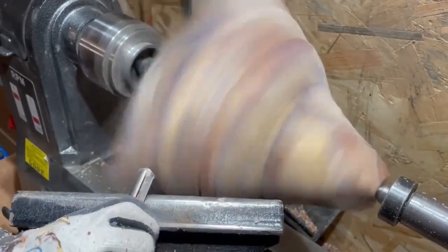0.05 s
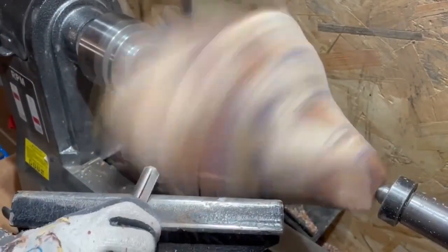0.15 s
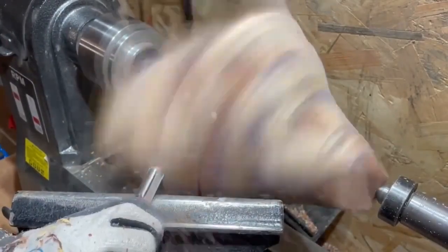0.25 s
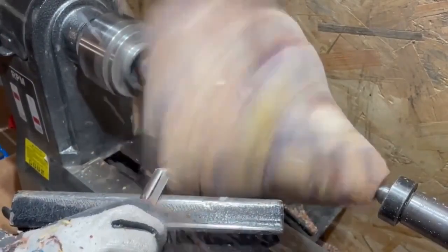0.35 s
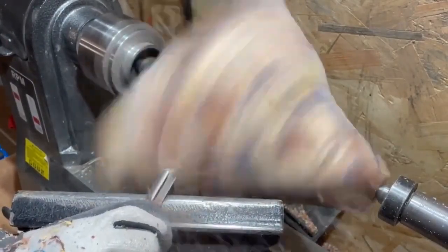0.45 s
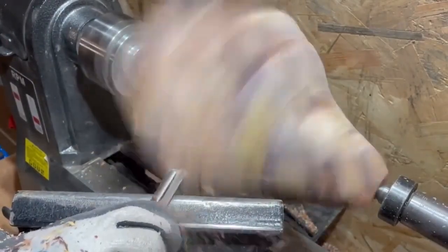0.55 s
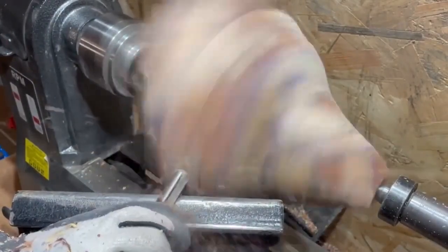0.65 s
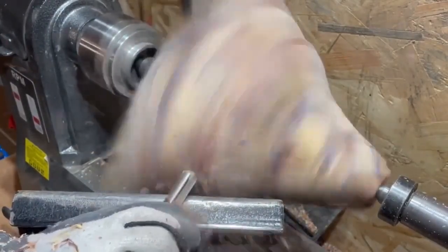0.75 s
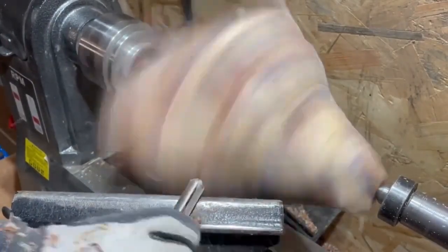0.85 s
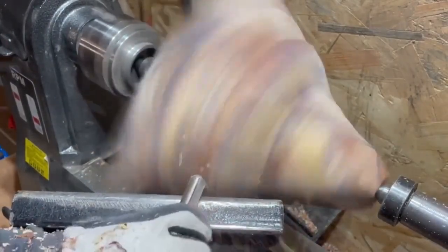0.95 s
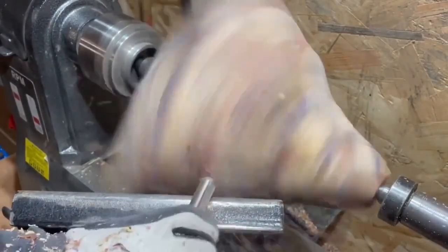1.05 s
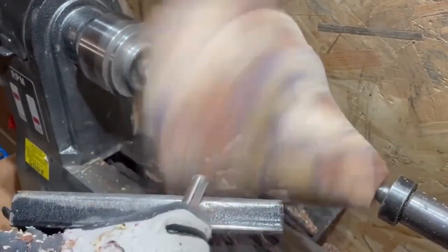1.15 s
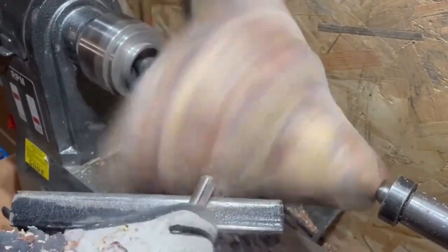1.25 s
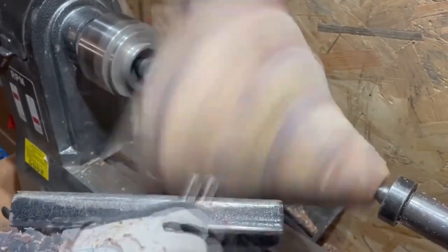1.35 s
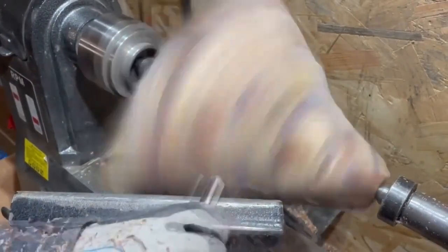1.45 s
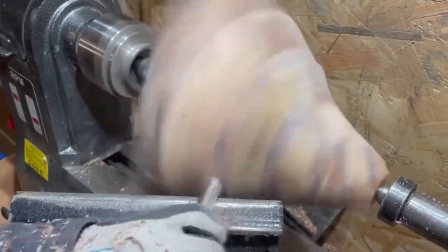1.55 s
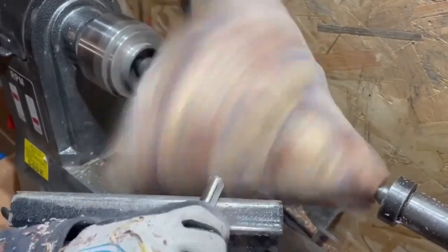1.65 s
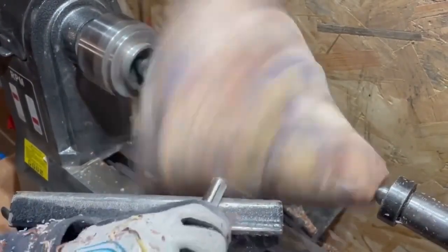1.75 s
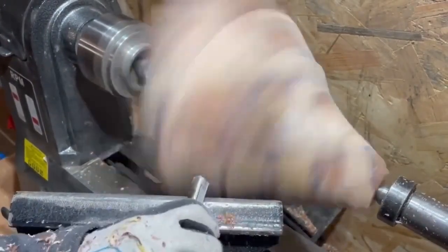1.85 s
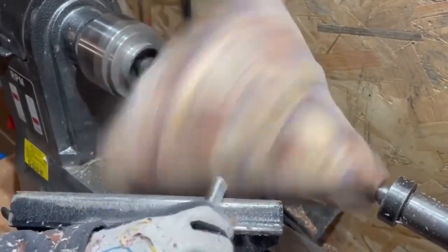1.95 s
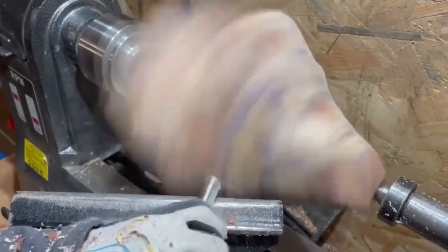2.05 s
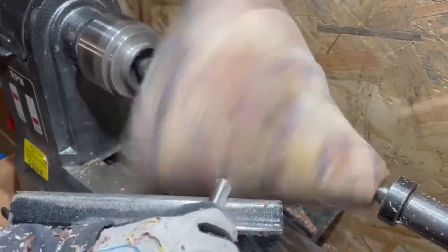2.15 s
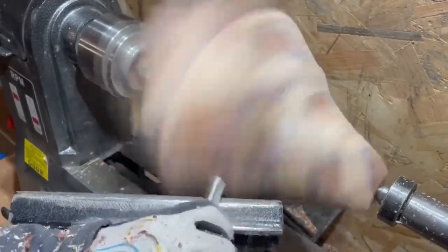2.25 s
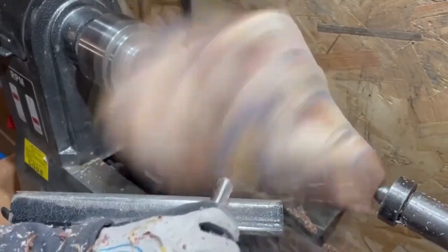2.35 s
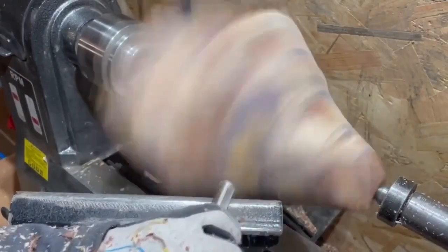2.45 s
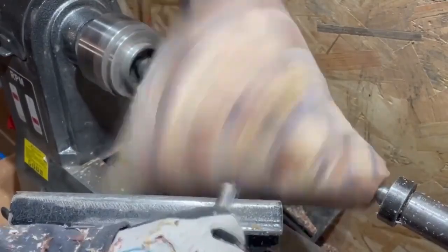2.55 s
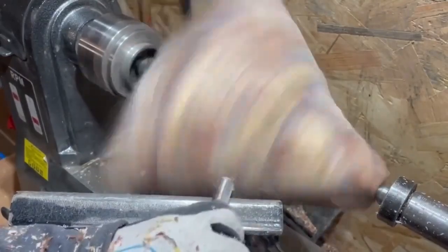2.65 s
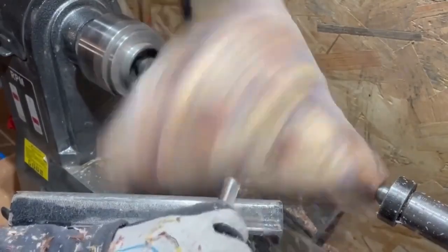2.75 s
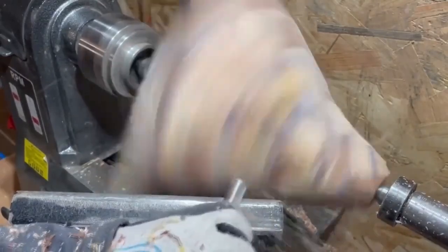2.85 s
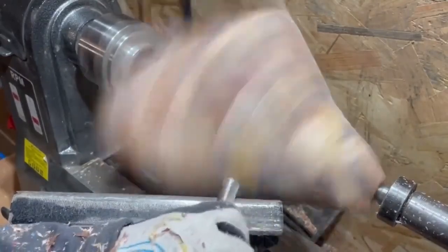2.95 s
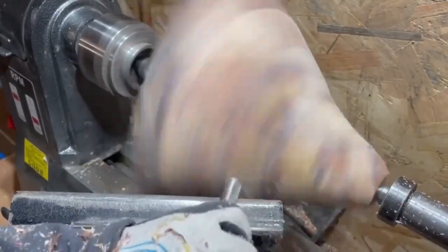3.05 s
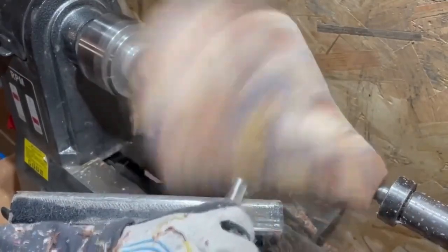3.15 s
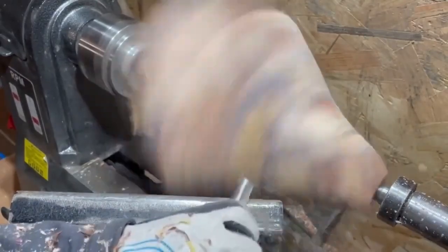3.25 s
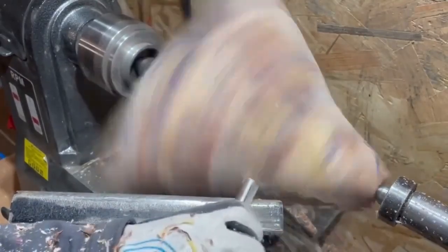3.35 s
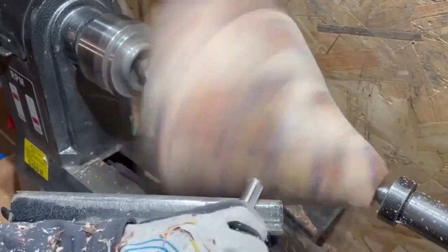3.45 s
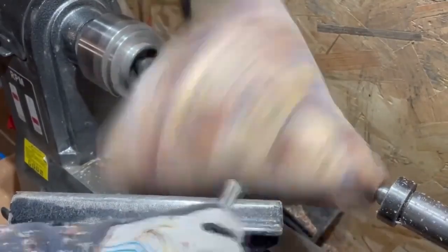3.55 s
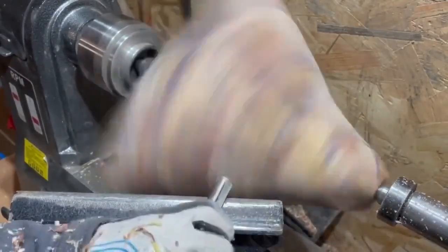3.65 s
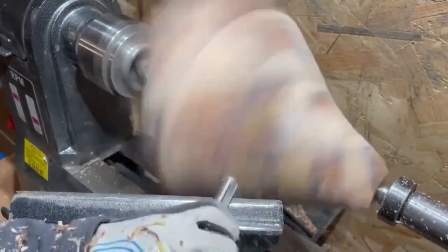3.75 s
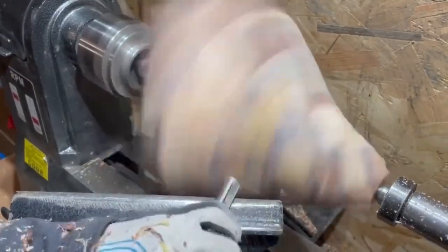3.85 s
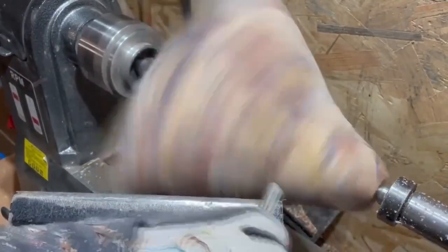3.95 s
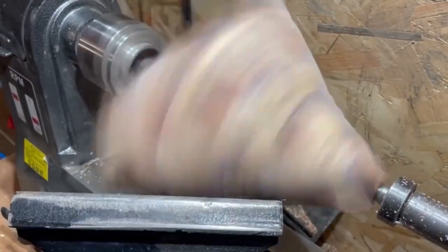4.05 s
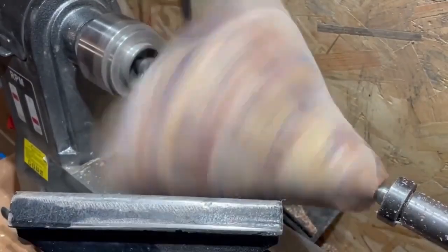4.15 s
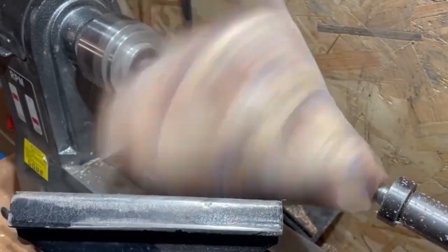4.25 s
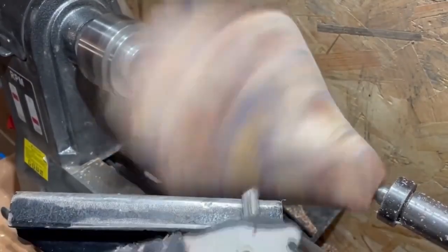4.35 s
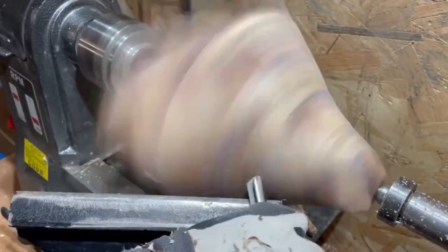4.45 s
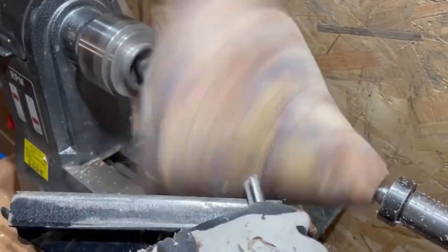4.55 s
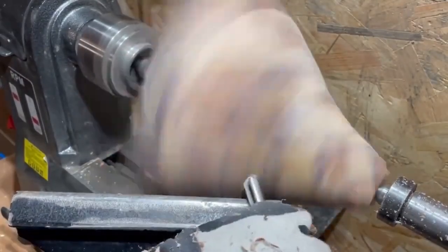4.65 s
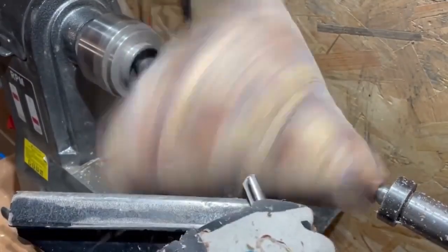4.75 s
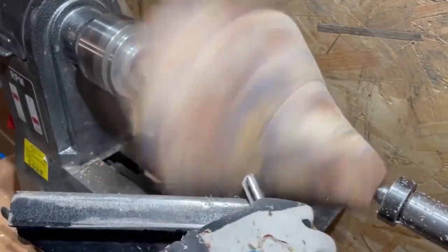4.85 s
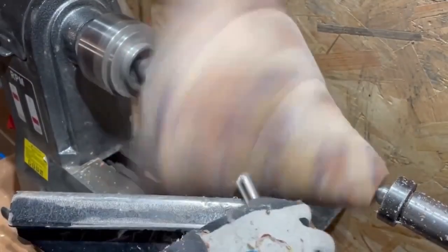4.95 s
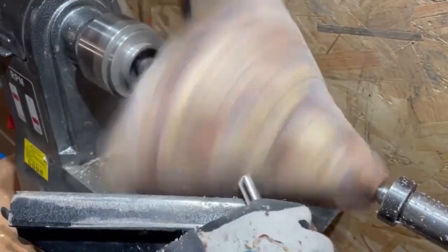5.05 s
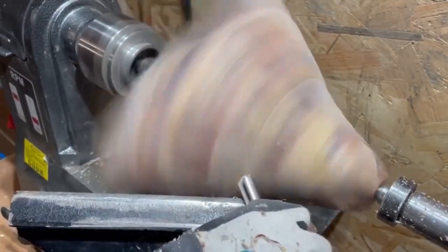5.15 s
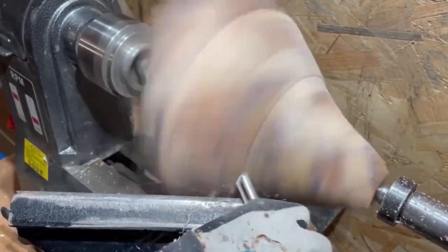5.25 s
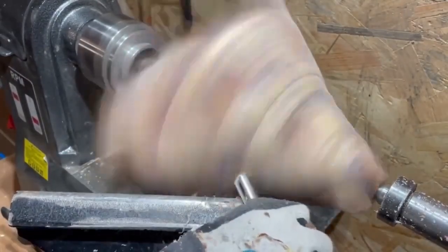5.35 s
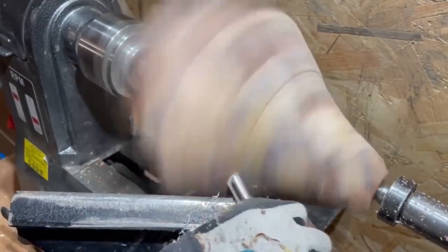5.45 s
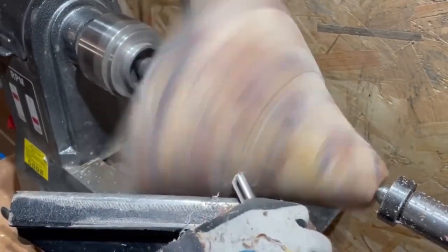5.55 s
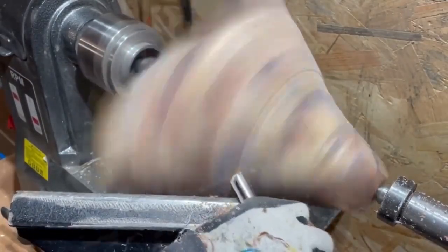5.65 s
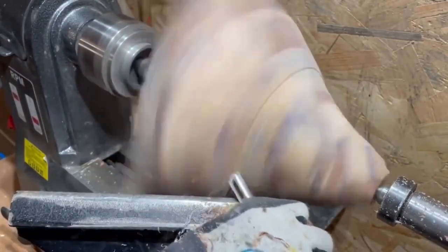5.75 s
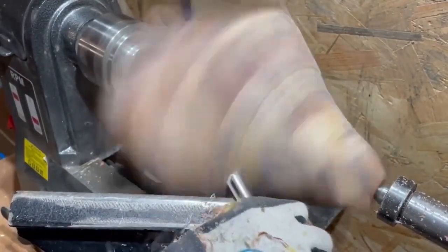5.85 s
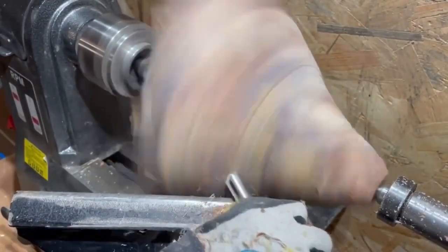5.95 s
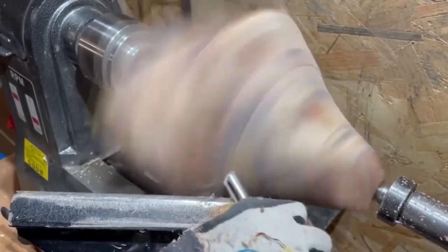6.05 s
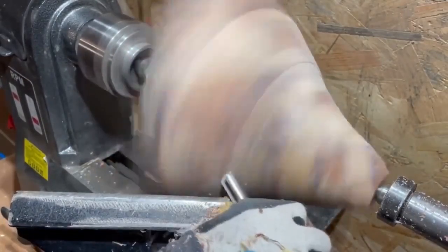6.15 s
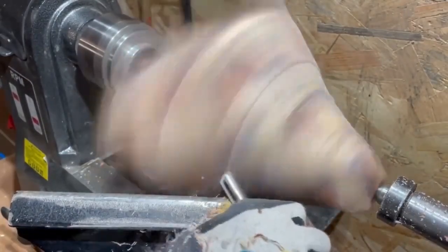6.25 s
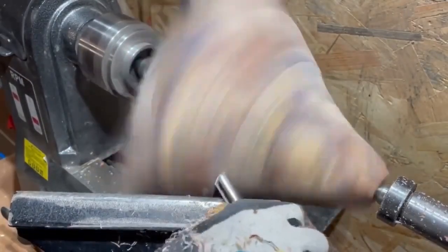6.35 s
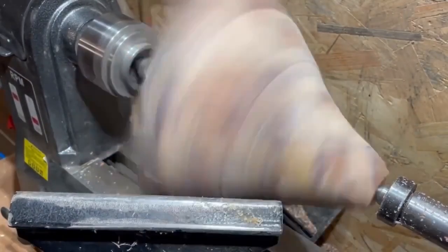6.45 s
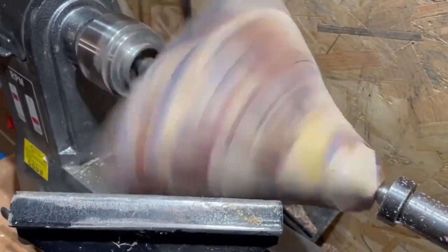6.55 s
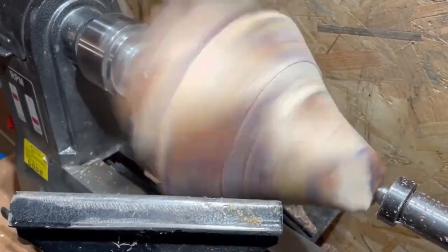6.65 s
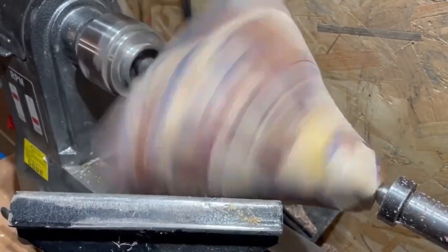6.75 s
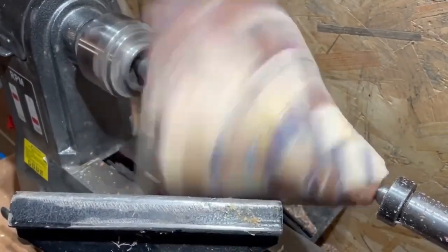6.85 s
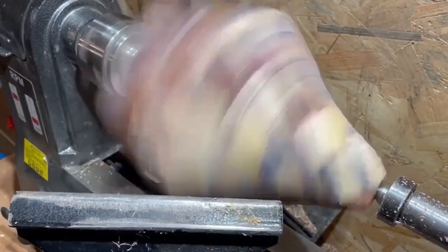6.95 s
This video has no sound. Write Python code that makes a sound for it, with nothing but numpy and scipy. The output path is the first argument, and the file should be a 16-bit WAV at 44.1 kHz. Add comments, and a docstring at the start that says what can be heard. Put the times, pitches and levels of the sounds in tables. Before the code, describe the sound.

Rough, bright scraping with fine dusty hiss comes and goes over a low lathe hum, heard close and dry with moderate stereo width. Short and long passes alternate, rapidly throbbing as the tool meets the uneven wooden blank. Later the tone becomes woodier and less hissy in a sustained cut, followed by dull taps and the motor's falling hum.

```python
"""A lathe motor hums from the start: shaft and belt sines over a noise drone, bearing rush and a thin whine.
From 0.1 s a steel tool shaves a wooden blank in passes with brief lifts: force-scaled noise, throbbing
43 times a second, excites resonances of tip, shank, blank, bed and stand, and fine dust hisses. From 4.4 s
dull knocks, made of decaying noise, join in; the cut deepens, and the motor slows after the last pass.
The stereo width comes from one noise common to both channels and a separate one in each."""
import sys
import numpy as np
from scipy import signal
from scipy.fft import rfft, irfft, next_fast_len
from scipy.io import wavfile
from scipy.ndimage import uniform_filter1d, map_coordinates

SR = 44100
rng = np.random.default_rng(int(sys.argv[2]) if len(sys.argv) > 2 else 0)


def transcribe(u):
    """Save the signal u as a 16-bit wav file named by the first command-line argument.

    u: samples, shape (n,) or (channels, n), limited to [-1, 1]; the rate is SR.
    q: integer samples, one column per channel.
    """
    v = np.clip(np.atleast_2d(u).T, -1, 1)
    q = np.round(v * 32767).astype(np.int16)
    wavfile.write(sys.argv[1], SR, q)


N = 308693
TOP_HZ = 15740  # band limit

# Resonances of the parts struck by both cut and knocks; levels are relative within a part:
# centre_hz, width_hz, light_cut_db, deep_cut_db
BLANK_MODES = [(780, 110, 2.5, -5.5), (876, 21, -27, -1.5), (969, 116, 3, -10.5), (1137, 89, 5, -11.5),
               (1261, 183, 5, -1.5), (1470, 20, 3, 2.5), (1571, 88, 10, -7), (1630, 37, -0.5, -6),
               (1726, 63, 4.5, -5), (1918, 144, 7.5, -11)]
SHANK_MODES = [(2127, 106, -3, -6.5), (2192, 99, 4, 3), (2297, 91, -5.5, -2), (2383, 80, 1, 2),
               (2573, 76, 0, 0), (2768, 106, 3.5, -3), (2953, 112, 6.5, 3), (3093, 54, -5, 1.5),
               (3217, 220, 2.5, -13)]
TIP_MODES = [(3460, 44, -6, 0.5), (3708, 92, 4.5, -18), (4030, 205, -5, -0.5), (4227, 130, -6.5, 3),
             (4524, 74, -6, -2.5), (4856, 150, -6, -2.5), (5155, 132, -6.5, 1.5), (5430, 230, -10, -4.5),
             (6000, 350, -18, -10.5), (6330, 82, -3.5, -10), (6950, 410, -69, -38)]


def amp(db):
    """Level law: amplitude gain is ten to the power of dB over 20."""
    return 10 ** (np.asarray(db) / 20)


def unit(x):
    """Power normalisation: x at rms 1."""
    return x / np.sqrt(np.mean(np.abs(x) ** 2) + 1e-20)


def along(points, hz, column=1):
    """Logarithmic frequency scale: interpolate a column of points whose first column is Hz."""
    table = np.transpose(points)
    return np.interp(np.log(hz + 1), np.log(table[0] + 1), table[column])


def curves(rows):
    """Linear interpolation in time: one value per sample for each column after the time."""
    time_s, *columns = np.transpose(rows)
    return [np.interp(np.arange(N) / SR, time_s, column) for column in columns]


def wobble(rate_hz):
    """Band-limited random drift: a smooth curve through rate_hz random knots a second."""
    knots = rng.standard_normal(int(N * rate_hz / SR) + 4)
    return map_coordinates(knots, [np.arange(N) * rate_hz / SR])


def filtered(x, response):
    """Convolution theorem: multiply the spectrum of x by a complex response of frequency."""
    m = next_fast_len(N + SR // 4)
    spectrum = rfft(x, m) * response(np.fft.rfftfreq(m, 1 / SR))
    return irfft(spectrum, m)[..., :N]


def modes(table, column=2):
    """Modal superposition: resonances of a body add in power, passing white noise at rms 1."""
    def response(f):
        power = 0
        for row in table:
            centre_hz, width_hz = row[:2]
            detuning = (f * f - centre_hz ** 2) / (f * width_hz + 1e-9)
            power = power + amp(2 * row[column]) / (1 + detuning ** 2) ** 1.465
        return unit(np.sqrt(power))
    return response


def colour(points):
    """Spectral shaping: a smooth response below the band limit, passing white noise at rms 1."""
    return lambda f: unit(amp(along(points, f)) * (f < TOP_HZ))


def noises():
    """Statistical independence: one noise common to both channels, then a separate one for each."""
    return rng.standard_normal((3, N))


def patchy(x, patchy_db):
    """Random modulation in time and frequency: bands swell and fade, alike in all noises."""
    z = signal.stft(x, nperseg=1024)[2]
    field = rng.standard_normal(z.shape[1:])
    field = uniform_filter1d(field, size=5, axis=0)  # across frequency
    field = uniform_filter1d(field, size=7, axis=1)  # across time
    gain = unit(amp(patchy_db * unit(field)))
    return signal.istft(z * gain, nperseg=1024)[1][:, :N]


def motor():
    """Rotating machinery: lines at multiples of shaft speed, with broadband drone, rush and whine."""
    # Relative levels, before the recession during a cut: time_s, hum_db, whine_db, bearing_rush_db
    motor_levels = [(0, -57, -58.5, -68), (.7, -61.5, -59, -67), (1.85, -53.5, -56, -65.5),
                    (2.6, -56.5, -58, -66), (3.6, -56.5, -57.5, -65.5), (4.1, -52.5, -54, -62.5),
                    (4.5, -50, -53, -60.5), (5.5, -50, -50, -61), (6.4, -49.5, -49, -61),
                    (6.49, -47.5, -53, -58), (6.55, -44.5, -49.5, -52.5), (6.8, -44, -47, -53.5),
                    (7, -44.5, -47.5, -54)]
    # Shaft and belt lines: multiple_of_shaft_speed, relative_db
    shaft_lines = [(1, -10), (2, -8), (3, 2), (3.45, -12), (4.28, -7), (5, -12), (6, -4), (7, 11),
                   (7.5, -8), (8, 0)]
    # Spectra of the drone and of the bearing rush: frequency_hz, relative_db_per_hz
    drone_spectrum = [(15, -29), (30, -9), (70, -4), (130, -12), (180, -9), (225, -13), (280, -4),
                      (400, -7), (560, -5), (660, 0), (800, -10.5), (1000, -36), (1400, -55)]
    rush_spectrum = [(500, -7), (900, 3), (1300, -1), (2000, -1.5), (3250, -10), (3400, -3.5), (3550, -7),
                     (5000, -16.5), (8000, -16), (9500, -23), (10800, -35), (15700, -56)]
    # Noise bands beside the whine's tone: centre_hz, width_hz, relative_db
    whine_bands = [(10030, 240, 3), (13950, 100, -15)]
    shaft_hz, slows_s, sag_hz_per_s = 94.9, 6.65, 6.07
    whine_hz = 9971  # centre of the unsteady tone
    hum_duck_db, drone_duck_db, whine_duck_db = 6, 1, 10  # how far each recedes at full force

    hum_db, whine_db, rush_db = curves(motor_levels)
    t = np.arange(N) / SR
    cutting = uniform_filter1d(np.clip(pressure() / amp(-32.5), 0, 1), size=2000)

    speed_hz = shaft_hz - sag_hz_per_s * np.clip(t - slows_s, 0, None)
    turn = 2 * np.pi * np.cumsum(speed_hz) / SR + .05 * wobble(20)
    lines = 0
    for multiple, db in shaft_lines:
        start = rng.uniform(0, 2 * np.pi)
        lines = lines + amp(db + 1.75 * wobble(14)) * np.sin(multiple * turn + start)
    lines = lines * [[1], [0], [0]]  # in the common part only
    drone = amp(0.42 * wobble(16)) * filtered(noises(), colour(drone_spectrum))
    lines_gain = amp(-5.5 - hum_duck_db * cutting)
    drone_gain = amp(1.0 - drone_duck_db * cutting)
    hum = amp(hum_db) * (lines_gain * lines + drone_gain * drone)

    rush_noise = filtered(patchy(noises(), patchy_db=2.0), colour(rush_spectrum))
    rush = amp(rush_db + 1.8 * wobble(40)) * rush_noise

    start = rng.uniform(0, 2 * np.pi, (3, 1))
    tone = np.sin(2 * np.pi * whine_hz * t + 2.0 * wobble(25) + start)
    bands = amp(-9) * filtered(noises(), modes(whine_bands))
    whine = amp(whine_db - whine_duck_db * cutting) * (tone + bands)
    return hum + rush + whine


def pressure():
    """Contact force as a gain: each pass enters, holds and leaves, and surges bend the level."""
    # Passes of the tool: touch_s, attack_s, hold_s, release_s, entry_db, exit_db
    passes = [(0.102, .11, 0.61, 0.075, -39.5, -40.5), (0.891, 0.046, 0.0029, 0.032, -39.5, -35.5),
              (.95, 0.028, 0.11, 0.034, -37, -42.5), (1.112, 0.028, 0.17, .03, -40.5, -36.5),
              (1.321, 0.067, .37, 0.058, -39, -42), (1.88, 0.072, 0.022, 0.039, -44, -39.5),
              (1.999, 0.041, 0.095, 0.026, -46.5, -43.5), (2.15, 0.036, 0.033, 0.043, -32.5, -40),
              (2.264, 0.072, 0.11, 0.032, -34.5, -40), (2.469, 0.041, 0.042, 0.039, -41.5, -48),
              (2.599, 0.081, 0.23, 0.056, -41, -40.5), (2.94, 0.096, 0.49, 0.046, -40, -42),
              (3.604, 0.12, 0.12, 0.043, -41.5, -45.5), (3.863, 0.042, 0.056, 0.044, -44.5, -41),
              (4.348, .013, .004, .014, -53.5, -53), (4.419, 0.073, .12, 0.11, -46.5, -38.5),
              (4.672, 0.064, 0.25, 0.06, -41, -33.5), (5.019, .02, 0.076, 0.043, -42.5, -32.5),
              (5.128, 0.045, 0.3273, 0.04, -37, -35), (5.521, 0.029, 0.837, 0.021, -36.5, -34.5)]
    # The edge digs in (+) or eases off (-): centre_s, standard_deviation_s, change_db
    surges = [(.63, 0.15, 5.5), (1.46, 0.025, 3.5), (1.608, 0.019, -6), (1.77, 0.015, 8), (2.12, 0.0094, 9),
              (2.72, 0.03, 5), (2.78, 0.016, -2), (2.83, 0.014, 4), (3.02, 0.012, -11), (3.19, 0.055, 2.5),
              (3.33, 0.0076, 4), (4.6, 0.013, 1), (5.29, 0.012, -0.5), (5.42, 0.033, 3.5), (5.58, 0.031, 3),
              (5.77, .04, 0), (5.93, .03, -2), (6.06, .04, 2.5), (6.4, .03, -4), (5.45, .015, 1),
              (2.98, 0.0091, 1.5), (3.44, 0.0089, 3), (5.12, 0.012, 1), (2.321, 0.0088, 2.5),
              (2.295, 0.0062, 2.5), (2.645, 0.0081, 4), (3.22, .01, 1), (.915, .006, 1.5),
              (3.175, .008, 3.5), (5.045, 0.0083, 5.5), (.4, 0.027, 2.5), (1.7, .03, 0.5),
              (4.85, 0.015, -0.5)]
    entry_bend, exit_bend = 1.42, 1.92  # curvature (exponent) of attack and release

    t = np.arange(0, N + 44, 44) / SR  # coarse grid, about 1 ms
    touch, attack, hold, release, entry_db, exit_db = np.transpose(passes)[..., None]
    since = t - touch
    entering = np.clip(since / attack, 0, 1) ** entry_bend
    leaving = np.clip((attack + hold + release - since) / release, 0, 1) ** exit_bend
    level_db = entry_db + (exit_db - entry_db) * np.clip((since - attack) / hold, 0, 1)
    surge_db = sum(db * np.exp(-.5 * ((t - s) / width) ** 2) for s, width, db in surges)
    force = np.sqrt(np.sum((entering * leaving * amp(level_db)) ** 2, axis=0)) * amp(surge_db)
    return np.interp(np.arange(N) / SR, t, force)


def tearing(grain_db, throb_db):
    """Amplitude modulation: fibres break in clumps, and the level throbs 43 times a second."""
    throb_hz = 43
    throb_phase = 2 * np.pi * throb_hz * np.arange(N) / SR + .8 * wobble(4)
    drift_db = .35 * wobble(30)
    return unit(amp(grain_db * wobble(400) + throb_db * np.sin(throb_phase) + drift_db))


def cut():
    """Forced vibration: tearing drives every part; a deeper cut stirs other resonances of them."""
    # As the tool travels, part levels relative to the shank:
    # time_s, deep_share (0-1), tip_db, blank_db, bed_db, stand_db, dust_db (before a fixed lift)
    travel = [(0, 0.17, -0.5, -15, -12.5, -9, 0), (.4, 0, 2.5, -12.5, -13, -13, -8),
              (.75, 0.04, 1.5, -10.5, -8, -13, -5.5), (1.2, .04, 2.5, -9, -8.5, -10, -3.5),
              (1.6, .04, 4, -9, -10.5, -12.5, -4), (2.1, 0.04, 3, -7.5, -8.5, -12.5, -3),
              (2.4, 0.02, 2, -5.5, -7, -10.5, -3.5), (2.8, 0.03, 2, -7, -7.5, -11, -5),
              (3.2, 0.04, 1, -3.5, -4, -5.5, -6), (3.45, 0.03, 2, -6.5, -9, -13.5, -7),
              (3.75, 0.06, 3, -6.5, -4, -13.5, -3.5), (3.92, 0.17, -3.5, -5, -10.5, -15.5, -10),
              (4.5, 0.14, 1, -5.5, -3.5, -14.5, -6.5), (4.8, 0.8, -1.5, -1.5, -4.5, -16.5, -10),
              (5.1, 0.88, -7, 1, -4.5, -13.5, -15), (5.27, 0.7, -1.5, -2, 0, -8.5, -11),
              (5.45, 0.99, -7.5, 0, -3.5, -15, -13.5), (5.52, 0.99, -8, 2, -5, -16, -21.5),
              (5.65, 0.96, -7.5, -0.5, -3, -13, -13.5), (5.9, .98, -4.5, -0.5, -1.5, -10.5, -14.5),
              (6.33, 1, -6.5, 1, 0, -11, -14.5), (6.4, 0.93, -14, 0, -12, -14, -28)]
    # Resonances of bed and stand: centre_hz, width_hz, light_cut_db, deep_cut_db (relative)
    bed_modes = [(276, 44, 3.5, -3), (357.4, 50, -6.5, -2.5), (420.8, 17.4, -3.5, 2), (482, 39, -18.5, -5),
                 (548, 28, -5, -4.5), (659, 103, -6.5, -14)]
    stand_modes = [(38, 30, -11, -18), (64.6, 35, -3.5, -11), (114, 44, 5, -5.5), (152.5, 8.9, -18, 5.5),
                   (186.5, 28, -0.5, -3)]
    # Spectrum of the dust hiss: frequency_hz, relative_db_per_hz
    dust_spectrum = [(3000, -50), (5500, -7), (7500, 1), (9500, -2.5), (10400, 0), (11500, -3.5),
                     (13000, -4.5), (14000, -5.5), (14800, -13), (15700, -20)]
    usual_db = -38  # force about which the parts grow

    depth, tip_db, blank_db, bed_db, stand_db, dust_db = curves(travel)
    depth = np.clip(depth, 0, 1)
    push = pressure() / amp(usual_db)
    grain = amp(usual_db) * tearing(grain_db=1.13, throb_db=0.94)

    dust_growth = 1.09  # dB for each dB of force, as in the parts below
    dust_drive = amp(dust_db + 4.5) * push ** dust_growth * grain * patchy(noises(), patchy_db=2.5)
    light = filtered(dust_drive, colour(dust_spectrum))
    deep = 0
    # level over the shank in dB, growth in dB for each dB of force, resonances
    parts = [
        (0, 1, SHANK_MODES),
        (tip_db, 1.033, TIP_MODES),
        (blank_db, 0.87, BLANK_MODES),
        (bed_db, 0.81, bed_modes),
        (stand_db, 0.83, stand_modes),
    ]
    for db, growth, part in parts:
        level = amp(db + 0.51 * wobble(25))
        drive = level * push ** growth * grain * patchy(noises(), patchy_db=1.44)
        light = light + filtered(np.sqrt(1 - depth) * drive, modes(part, column=2))
        deep = deep + filtered(np.sqrt(depth) * drive, modes(part, column=3))
    return light, deep


def taps():
    """Impact excitation: short noise blows of the tool on its rest ring in tool and blank."""
    # Knocks: start_s, relative_level_db
    knocks = np.array([(4.361, -31), (6.4394, -43), (6.5294, -36), (6.572, -32), (6.9064, -55)])
    since = np.clip(np.arange(N) / SR - knocks[:, :1], 0, 1)
    decay_db = 60 * since / 0.035  # 60 dB in 35 ms
    rise = 1 - np.exp(-since / 0.002)
    blow = np.sum(amp(knocks[:, 1:] - 13.0 - decay_db) * rise, axis=0)
    tool = modes(SHANK_MODES + TIP_MODES)
    blank = modes(BLANK_MODES)
    return filtered(blow * noises(), lambda f: tool(f) + 0.44 * blank(f))


def stereo(sound, column):
    """Stereo width: one noise is common to both channels with a phase offset, the rest separate in each."""
    # Power share common to both channels: frequency_hz, share (0-1)
    common_share = [(60, .99), (180, .98), (300, .88), (500, .6), (1000, .75), (2000, .72), (3500, .85),
                    (5700, .55), (6400, .8), (7300, .45), (7900, .9999), (9300, .9999), (9700, .9),
                    (10100, .6), (11200, .35), (12000, .9), (12400, .999)]
    # Phase by which left leads right: frequency_hz, lead_rad
    phase_lead = [(200, 0), (450, -.3), (680, -1.7), (950, 0), (1500, .1), (3500, .6), (5200, .5),
                  (5900, -.9), (7000, -1.1), (7800, -np.pi), (9500, -np.pi), (11000, -4.6),
                  (12200, -2 * np.pi)]
    # Left minus right: frequency_hz, light_cut_db, deep_cut_and_motor_db
    level_difference = [(160, 0, 0), (260, 3, 2.5), (520, -3, -.5), (850, 2, -3.5), (1070, 3.5, -1),
                        (1500, 2, .3), (2200, 6, 2), (3500, 3, 3), (5700, 1, 1.5), (7800, 0, 0)]
    side = np.array([[.5], [-.5]])  # half of each difference to either channel

    def share(f):
        return np.clip(along(common_share, f), 0, 1)

    def gain(f):
        return amp(side * along(level_difference, f, column))

    def common_response(f):
        return gain(f) * np.sqrt(share(f)) * np.exp(1j * side * along(phase_lead, f))

    common = filtered(sound[0], common_response)
    separate = filtered(sound[1:], lambda f: gain(f) * np.sqrt(1 - share(f)))
    return common + separate


def scene():
    """Linear superposition: motor, cut and knocks add in both channels."""
    running = motor()
    light, deep = cut()
    return stereo(light + taps(), column=1) + stereo(deep + running, column=2)


def record(dry):
    """Band limitation: nothing is kept at or above the band limit."""
    return filtered(dry, lambda hz: hz < TOP_HZ)


dry = scene()
out = record(dry)
transcribe(out)
```